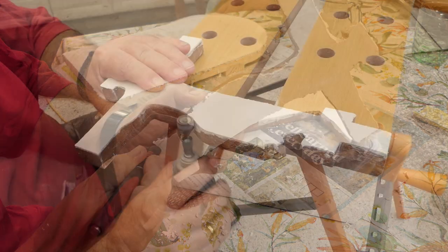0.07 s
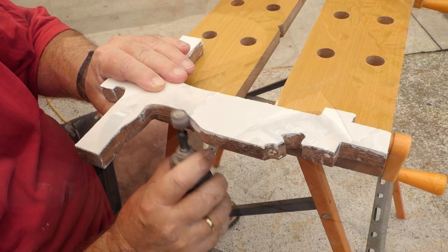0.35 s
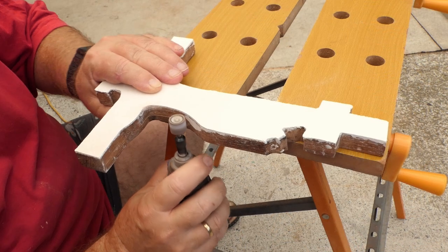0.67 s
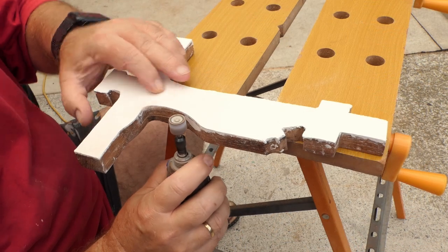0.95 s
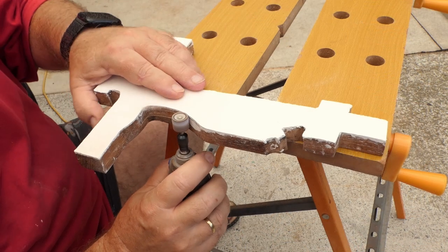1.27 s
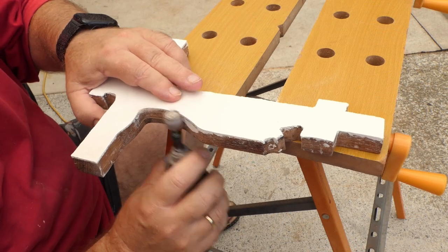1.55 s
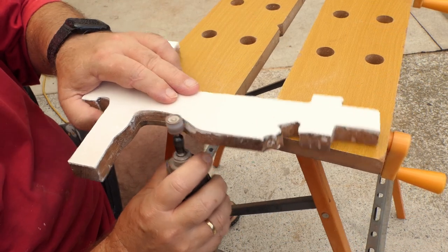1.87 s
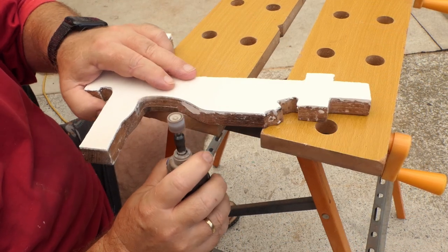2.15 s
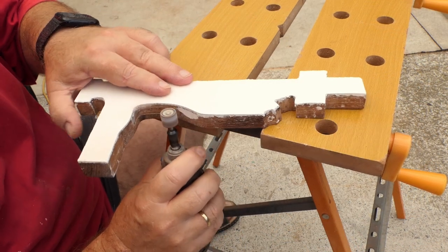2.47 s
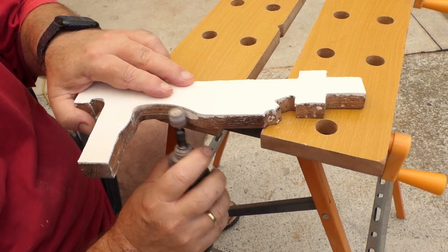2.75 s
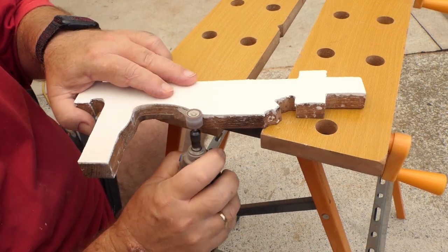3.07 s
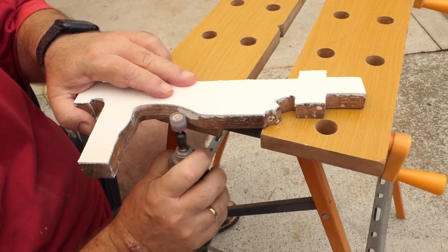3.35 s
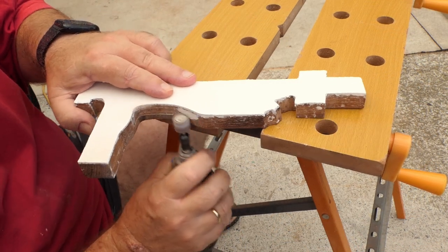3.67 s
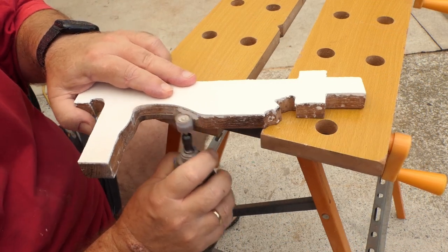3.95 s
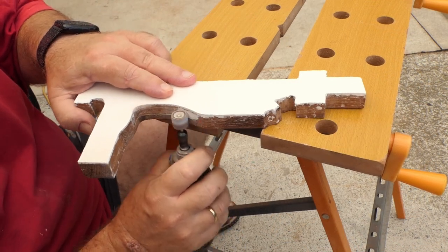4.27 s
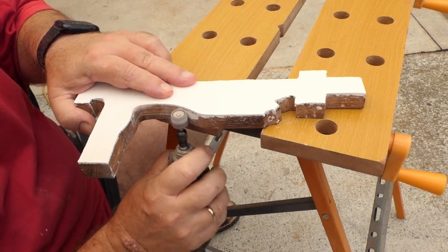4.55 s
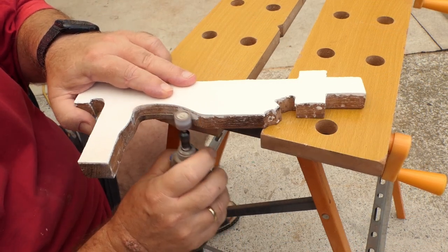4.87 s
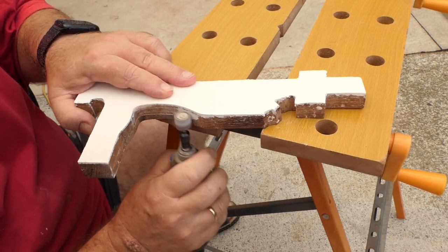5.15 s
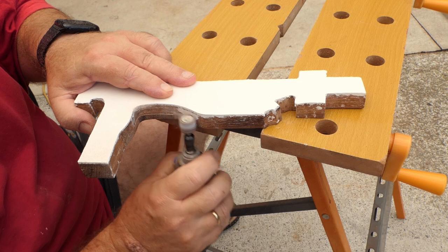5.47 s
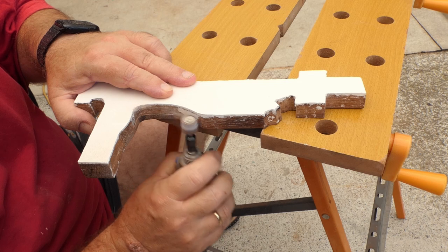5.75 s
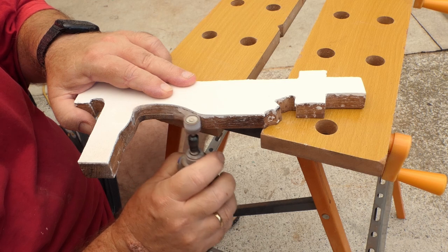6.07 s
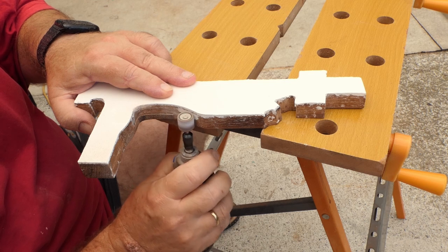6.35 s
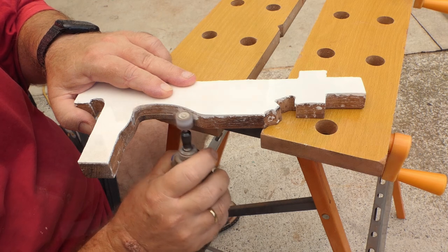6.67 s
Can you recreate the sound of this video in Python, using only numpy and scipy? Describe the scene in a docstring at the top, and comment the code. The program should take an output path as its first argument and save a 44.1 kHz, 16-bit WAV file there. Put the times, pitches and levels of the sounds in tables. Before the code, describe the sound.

High-pitched whirring of a handheld rotary sander, grinding against wood in two short passes and one long one.

```python
"""Rotary tool sanding wood

A small rotary tool sands the edge of a wooden cut-out on a workbench outdoors. The drum's grit rasps,
chatters and snags on the wood; the motor whines up when lifted and bogs down when pressed in.
A light breeze touches the microphone, which feeds the left channel; faint hiss lies on both sides."""
import sys
import numpy as np
from scipy import signal
from scipy.fft import rfft, irfft, next_fast_len
from scipy.io import wavfile
from scipy.ndimage import uniform_filter1d, map_coordinates

SR = 44100
rng = np.random.default_rng(int(sys.argv[2]) if len(sys.argv) > 2 else 0)


def wav_out(sig):
    """Save sig, one row per channel (or a flat mono array), as 16-bit PCM at SR to the path in sys.argv[1]."""
    wavfile.write(sys.argv[1], SR, np.round(np.clip(np.atleast_2d(sig).T, -1, 1) * 32767).astype(np.int16))


N = 304731

TIME = np.arange(N) / SR
USUAL_SPEED, USUAL_DRAG = 100, 50  # an ordinary stroke, both in turns/s


def amp(db):
    """Decibels to gain."""
    return 10 ** (np.asarray(db) / 20)


def unit(x):
    """Scale to rms 1."""
    return x / np.sqrt(np.mean(x ** 2) + 1e-20)


def curves(rows):
    """One value per sample for each column after the time."""
    s, *cols = np.transpose(rows)
    return [np.interp(TIME, s, c) for c in cols]


def wobble(rate):
    """A smooth random curve, rate knots a second."""
    return map_coordinates(rng.standard_normal(int(N * rate / SR) + 4), [TIME * rate])


def filtered(x, response):
    """x times a response of frequency."""
    m = next_fast_len(N + 8192)
    return irfft(rfft(x, m) * response(np.fft.rfftfreq(m, 1 / SR)), m)[..., :N]


def coloured(x, slope, resonances=(), size=8192):
    """x through a causal filter: a sloping spectrum with resonant humps; rms 1."""
    hz = np.fft.rfftfreq(size, 1 / SR)
    f, level = np.transpose(slope)
    db = np.interp(np.log(hz + 1), np.log(f), level)
    for centre, width, height in resonances:
        db = db + height / (1 + (2 * (hz - centre) / width) ** 2)
    cepstrum = irfft(np.log(amp(db)))
    cepstrum[1:size // 2] *= 2
    cepstrum[size // 2 + 1:] = 0
    return unit(signal.fftconvolve(x, irfft(np.exp(rfft(cepstrum))))[:N])


def band(x, lo_hz, hi_hz):
    """One band of x, held near rms 1 from moment to moment."""
    part = filtered(x, lambda hz: 1 / np.sqrt((1 + (lo_hz / (hz + 1)) ** 16) * (1 + (hz / hi_hz) ** 16)))
    return part / np.sqrt(np.abs(uniform_filter1d(part ** 2, size=4096)) + 1e-12)


def scrapes(turns, count, spread_db, fresh, memory):
    """Rough points around a rotor strike once a turn; which of them bite drifts over `memory` turns."""
    laps = int(turns[-1]) + 1
    chance = rng.standard_normal((laps, count, 3))
    keep = np.exp(-1 / memory)
    own = signal.lfilter([np.sqrt(1 - keep ** 2)], [1, -keep], chance[..., 0], axis=0)
    strength = (own + fresh * chance[..., 1]) * amp(spread_db * chance[..., 2])
    at = np.interp(np.arange(laps)[:, None] + rng.random(count), turns, TIME, right=-1)
    heard = at >= 0
    return unit(np.bincount(np.round(at[heard] * SR).astype(int), strength[heard], N))


def swells(rows):
    """Rounded envelopes from rows of (middle [s], length [s], heights...), one per height column."""
    s, length, *heights = np.transpose(rows)
    reach = np.abs(2 * (TIME - s[:, None]) / length[:, None])
    return np.array(heights) @ np.exp(-np.minimum(reach, 4) ** 3)


def resonant(x, centre_hz, width_hz):
    """x through one narrow resonance; rms 1."""
    def response(hz):
        damping = 1j * hz * width_hz
        return (damping / (centre_hz ** 2 - hz ** 2 + damping)) ** 2
    return unit(filtered(x, response))


# Tone of the outdoor bed: (frequency [Hz], level [dB])
YARD_EQ = [(30, -7.5), (130, -3), (290, -4), (345, 2.5), (375, 12), (420, 2), (600, -0.5), (1000, -3.5),
           (2000, -13.5), (6000, -13), (15800, -21)]

def yard_drone():
    """A faint outdoor bed of noise with a low drone in it."""
    return amp(-63.0) * coloured(rng.standard_normal(N), YARD_EQ)


# Tone of the input's noise floor: (frequency [Hz], level [dB])
HISS_EQ = [(8, 25), (25, -2), (75, -10.5), (150, -23), (700, -25), (15800, -27.5)]

def input_hiss():
    """Steady electronic noise, separate in each channel."""
    return amp(-56.0) * np.array([coloured(rng.standard_normal(N), HISS_EQ) for side in range(2)])


# Tone of the wind rumble: (frequency [Hz], level [dB])
BREEZE_EQ = [(15, -4), (38, -8), (62, -13), (100, -24), (200, -44), (500, -54)]
# Puffs of air: (middle [s], length [s], boost [dB])
PUFFS = [(.28, 0.55, 10), (1.81, 0.21, 13), (2.58, 0.44, 14), (3.12, .07, 11), (4.32, 0.24, 9),
         (5.7, 0.55, 8), (6.19, 0.074, 11), (6.28, 0.65, 13.5)]

def breeze(calm_db=-71):
    """Air buffets the microphone: a low rumble that swells with each puff."""
    return amp(calm_db + swells(PUFFS)[0]) * coloured(rng.standard_normal(N), BREEZE_EQ)


# Tone of the brushes and fan: (frequency [Hz], level [dB])
WHIRR_EQ = [(200, -41), (500, -25), (800, -11), (1400, 1), (2700, 0.6), (3600, 2.5), (5000, 1.5),
            (7000, -1), (8800, -13.5), (11500, -11), (15800, -17.5)]
# Resonances of the motor housing: (frequency [Hz], width [Hz], boost [dB])
HOUSING_MODES = [(1062, 280, 21), (1963, 390, 15.5), (2450, 210, 9), (3970, 1300, 8.5), (5700, 300, 2.5),
                 (6310, 400, 3.5)]

def motor_whirr(speed, turns):
    """Brushes and fan whirr inside the housing, louder with speed."""
    brushes = scrapes(turns, count=96, spread_db=2, fresh=1.6, memory=12)
    flutter = 1 + 0.17 * np.sin(np.pi * turns)  # swells every second turn
    level_db = -46.5 + 6.5 * np.log2(speed / 120) + 0.57 * wobble(12)
    return amp(level_db) * flutter * coloured(brushes, WHIRR_EQ, HOUSING_MODES)


# Partials of the motor: (multiple of shaft speed, level [dB])
WHINE_PARTIALS = [(15, -21), (16, -15), (17, -19), (18, 0), (32, -12), (46, -21), (50, -23), (81, -30),
                  (88, -32), (96, -26), (103, -31), (111, -31)]
# How the whine opens up: (speed [turns/s], level [dB])
WHINE_BY_SPEED = [(40, -88), (84, -60), (103, -47.8), (131, -44.7)]

def motor_whine(speed, turns):
    """Tones locked to the shaft, which the housing radiates well only at high speed."""
    angle = 2 * np.pi * turns + 0.014 * wobble(90)  # shaft tremor blurs the high partials most
    partials = sum(amp(db + 2 * wobble(25)) * np.sin(k * angle) for k, db in WHINE_PARTIALS)
    return amp(np.interp(speed, *np.transpose(WHINE_BY_SPEED))) * partials


# Hand pressure, as the speed it costs a settled motor: (time [s], drag [turns/s])
HAND_DRAG = [(0.07, 36.5), (0.628, 67.7), (1.274, 20.0), (1.48, 34.4), (1.6, 85.0), (1.915, 58.3),
             (2.73, 12.0), (2.87, 76.9), (3.02, 59.7), (3.2, 12.0), (3.33, 56.7), (3.45, 49.2), (3.7, 64.8),
             (3.82, 113.8), (5.9, 108.7), (6.3, 81.2), (6.62, 25.5), (6.91, 73.0)]

def shaft(start_speed=34.8, free_speed=145, inertia_s=0.644):
    """Speed and drag in turns/s: the motor eases towards its free speed less the drag of the wood."""
    drag, = curves(HAND_DRAG)
    contact = sum((TIME >= start) & (TIME <= end) for start, end, *levels in STROKES)
    keep = np.exp(-1 / (inertia_s * SR))
    bogging = signal.lfilter([1 - keep], [1, -keep], drag * contact)
    spin_up = free_speed - (free_speed - start_speed) * np.exp(-TIME / inertia_s)
    return (spin_up - bogging) * (1 + 0.002 * wobble(22)), drag


def patchy(x, depth_db):
    """The colour drifts as the point of contact moves over the wood."""
    spectra = signal.stft(x, nperseg=512)[2]
    patches = uniform_filter1d(rng.standard_normal(spectra.shape), size=6, axis=0)
    patches = uniform_filter1d(patches, size=14, axis=1)
    return signal.istft(spectra * amp(depth_db * unit(patches)), nperseg=512)[1][:N]


# Bouts of chatter: (middle [s], length [s], depth [0-1])
CHATTERS = [(.46, 0.12, 0.24), (1.35, .28, 0.58), (1.77, 0.72, 0.7), (2.82, .22, 0.35), (3.12, 0.11, 0.7),
            (3.33, 0.49, 0.5), (6.5, 0.23, 0.2)]

def drum_grit(speed, turns):
    """Grains scratch the wood; the slightly eccentric drum bounces and bites hardest once a turn."""
    depth = np.clip(swells(CHATTERS)[0], 0, 1)
    bounce = 1 + depth * np.cos(2 * np.pi * turns + 0.28 * wobble(70))
    bounce *= amp(0.78 * wobble(130))
    grains = scrapes(turns, count=300, spread_db=1, fresh=0.9, memory=5)
    # a slow drum meets fewer grains but digs in with each
    return patchy(unit(grains * bounce / np.sqrt(speed)), depth_db=1.5)


def shudder(speed, turns, drag, rolloff_hz=830):
    """The drum's uneven outline shakes the wood at multiples of its speed, more when fast and pressed."""
    shake = np.zeros(N)
    for k in range(4, 18):
        level = amp(3 * wobble(12)) / np.sqrt(1 + (k * speed / rolloff_hz) ** 10)
        phase = 2 * np.pi * (k * turns + rng.random()) + 0.55 * wobble(35)
        shake += level * np.sin(phase)
    return 0.17 * (speed / USUAL_SPEED) ** 1.5 * (drag / USUAL_DRAG) ** 0.6 * shake


def bench_hum(speed, turns, centre_hz=125, width_hz=49):
    """The lowest multiples of the shaft speed hum whenever they meet the bench's resonance."""
    hum = np.zeros(N)
    for k in range(1, 4):
        detune = 2 * (k * speed - centre_hz) / width_hz
        hum += np.sin(2 * np.pi * k * turns + wobble(18)) / (1 + detune ** 2)
    return amp(-77.5 + 3.8 * wobble(8)) * hum


def effort(speed, drag, speed_db, drag_db, waver_db):
    """Level in dB: so much per doubling of speed and of drag, plus the waver of the hand."""
    push_db = speed_db * np.log2(speed / USUAL_SPEED) + drag_db * np.log2(drag / USUAL_DRAG)
    return push_db + waver_db * wobble(18)


# The drum bites and the wood sings: (middle [s], length [s], rasp boost [dB], ring boost [dB])
BITES = [(.073, 0.017, 6, 7), (.11, 0.079, 4.5, -1), (.21, 0.11, 3, 1), (.42, 0.064, 3, 4),
         (.55, 0.074, 2, 4.5), (1.44, 0.12, 1.5, 6), (1.61, 0.036, 1.5, 4), (1.79, 0.1, 3, 1.5),
         (1.882, .05, 0.3, 7), (2.735, .035, -4.5, 5.5), (2.87, 0.061, 2, 4), (3.0, 0.042, 0.5, 6),
         (3.05, 0.043, 5, 4.5), (3.39, 0.046, 1.5, 4), (3.58, 0.068, 2.5, 4.5), (3.635, .05, -2.5, 5),
         (3.81, 0.11, 1.5, 2), (3.97, .05, -1, 4), (4.12, 0.12, -0.2, 5.5), (4.29, 0.11, -0.2, 4.5),
         (4.53, 0.063, .6, 4.5), (5.66, 0.089, .6, 3.5), (5.85, 0.097, 4, 3.5), (6.53, 0.15, -0.3, 3),
         (6.8, 0.58, -0.5, 4.5)]
# The drum digs in and growls: (middle [s], length [s], body boost [dB], growl boost [dB])
DIGS = [(.16, 0.19, 6.5, 3), (1.64, 0.06, -2, 5.5), (1.83, .19, -8, 11.5), (2.96, 0.19, -9, 3.5),
        (3.39, 0.092, -1, 3), (3.78, 0.14, 1.5, 4), (4.02, .09, 5.5, -3), (6.66, 0.22, 3, 3.5)]
# The drum skids with little grip: (middle [s], length [s], rasp cut [dB], ring cut [dB], growl cut [dB])
SKIDS = [(.3, 0.054, -1.3, 7, -1), (1.272, 0.041, 0, 3, 1.5), (3.11, 0.13, -1, -1, 9),
         (3.27, 0.13, -0.8, 2, 9), (3.47, 0.064, 1, 7, 2), (6.2, 0.83, 3.5, 4, .6)]

def grip(speed, drag):
    """Gain rides for rasp, ring, body and growl as the drum bites, digs in and skids."""
    bite_rasp, bite_ring = swells(BITES)
    dig_body, dig_growl = swells(DIGS)
    skid_rasp, skid_ring, skid_growl = swells(SKIDS)
    rasp = amp(effort(speed, drag, 4.6, 0.98, 0.61) + bite_rasp - skid_rasp)
    ring = amp(effort(speed, drag, 4.5, 1.45, 1.25) + bite_ring - skid_ring)
    body = amp(effort(speed, drag, 2.37, 3.1, 0.75) + dig_body - skid_growl / 2)
    growl = amp(effort(speed, drag, 2.9, 2.2, 1) + dig_growl - skid_growl)
    return rasp, ring, body, growl


# Tone of grit on wood: (frequency [Hz], level [dB])
WOOD_EQ = [(200, -24.5), (400, -20.5), (730, -10), (1000, -4), (1500, -7), (1800, 4), (2650, -5.5),
           (4000, -1.5), (5200, 0), (6500, -2.5), (8700, -16), (11500, -13), (13500, -15), (15800, -18.5)]
# Wood resonances, drum in the inner corner: (frequency [Hz], width [Hz], boost [dB])
CORNER_MODES = [(479, 63, 16.5), (613, 73, 7), (856, 120, 11.5), (1200, 190, 4.5), (1901, 68, 12.5),
                (2074, 150, 15), (2320, 160, 5.5), (3550, 250, 7), (4460, 310, 7.5), (6490, 280, 5),
                (10600, 4100, 3)]
# Wood resonances, piece shifted and drum on its long edge: (frequency [Hz], width [Hz], boost [dB])
EDGE_MODES = [(503, 65, 14.5), (603, 97, 14.5), (888, 170, 16.5), (1151, 28, 11), (1997, 170, 5),
              (2096, 91, 14.5), (2275, 270, 10), (3507, 150, 9.5), (4420, 950, 8), (7130, 280, 4),
              (11450, 500, 3), (12700, 620, 7.5)]
# Strokes and their base mix: (start [s], end [s], rasp [dB], ring [dB], body [dB], growl [dB])
STROKES = [(0.069, .628, -41, -45, -53.5, -66.5), (1.271, 1.915, -40.5, -48, -53, -66),
           (2.73, 6.92, -38.5, -42.5, -51.5, -60.5)]

def sanding(speed, turns, drag, land_s=0.0038, lift_s=0.005):
    """While the drum touches, grit and shudder sound the wood in four bands and the bench hums."""
    force = drum_grit(speed, turns) + shudder(speed, turns, drag)
    rasp_gain, ring_gain, body_gain, growl_gain = grip(speed, drag)
    hum = bench_hum(speed, turns)
    out = np.zeros(N)
    for stroke, modes in zip(STROKES, [CORNER_MODES, CORNER_MODES, EDGE_MODES]):
        start, end, rasp_db, ring_db, body_db, growl_db = stroke
        wood = coloured(force, WOOD_EQ, modes)
        rasp = amp(rasp_db) * rasp_gain * band(wood + squeal(wood), 2900, 17000)
        ring = amp(ring_db) * ring_gain * band(wood, 1300, 2730)
        body = amp(body_db) * body_gain * band(wood, 847, 1440)
        growl = amp(growl_db) * growl_gain * band(wood, 465, 713)
        landing = np.clip((TIME - start) / land_s + 1, 0, 1)
        lifting = np.clip((end - TIME) / lift_s + 1, 0, 1)
        out += landing * lifting * (rasp + ring + body + growl + hum)
    return out


# Squeal accents: (middle [s], length [s], lower mode [gain], upper mode [gain])
SQUEALS = [(1.315, 0.074, .8, 0.11), (1.6, .07, 0.28, 0.18), (1.8, 0.13, 0.32, .25),
           (3.11, 0.076, 0.64, 0.25), (3.25, 0.08, 0, 0.45)]

def squeal(wood, width_hz=250):
    """The bouncing drum sets two high modes squealing."""
    lower_gain, upper_gain = swells(SQUEALS)
    return lower_gain * resonant(wood, 3580, width_hz) + upper_gain * resonant(wood, 4690, 2 * width_hz)


# A quick stutter of knocks: (time [s], level [dB])
SNAGS = [(5.05, -28.5), (5.057, -30), (5.063, -36), (5.074, -34.5), (5.085, -34.5)]

def snags(t60=0.013):
    """Short dull knocks as the drum catches on the edge."""
    blows = np.zeros(N)
    for s, db in SNAGS:
        blows += (TIME >= s) * amp(db - 60 * np.abs(TIME - s) / t60)
    return band(rng.standard_normal(N), 1230, 2830) * uniform_filter1d(blows, size=24)


def scene():
    """Tool, yard and breeze sit hard left, with a trace of crosstalk on the right and hiss on both."""
    speed, drag = shaft()
    turns = np.cumsum(speed) / SR
    fade_in = np.clip((TIME - 0.066) / 0.0027, 0, 1)
    motor = fade_in * (motor_whirr(speed, turns) + motor_whine(speed, turns))
    mix = motor + sanding(speed, turns, drag) + snags() + yard_drone() + breeze()
    return mix * amp([[6], [-58]]) + input_hiss()


def record(dry):
    """A brick-wall low-pass takes off the very top."""
    return filtered(dry, lambda hz: hz < 15900)


dry = scene()
out = record(dry)
wav_out(out)
```